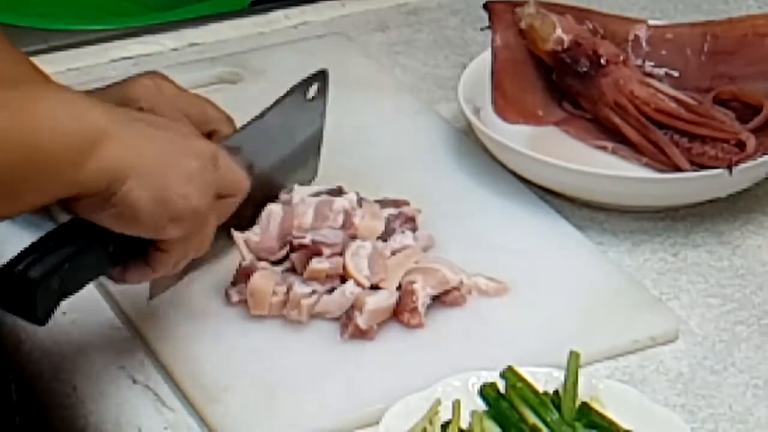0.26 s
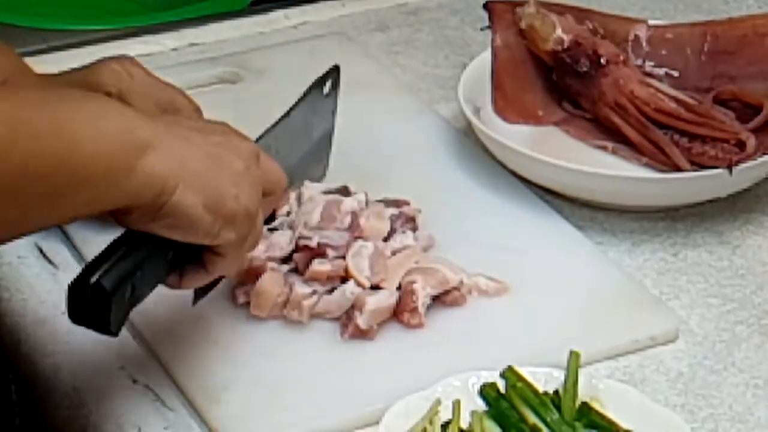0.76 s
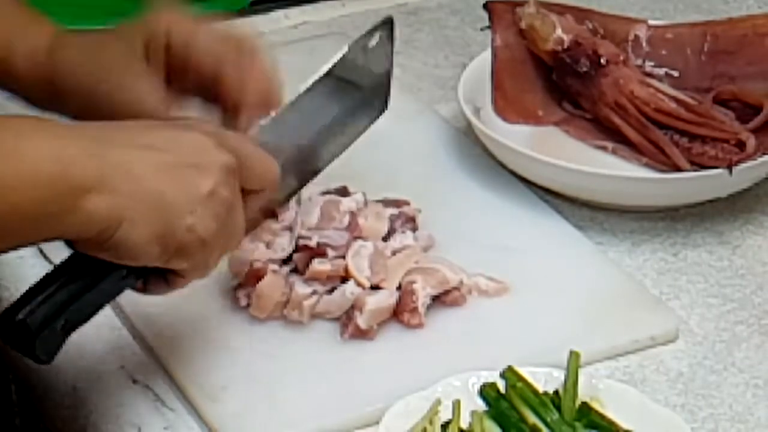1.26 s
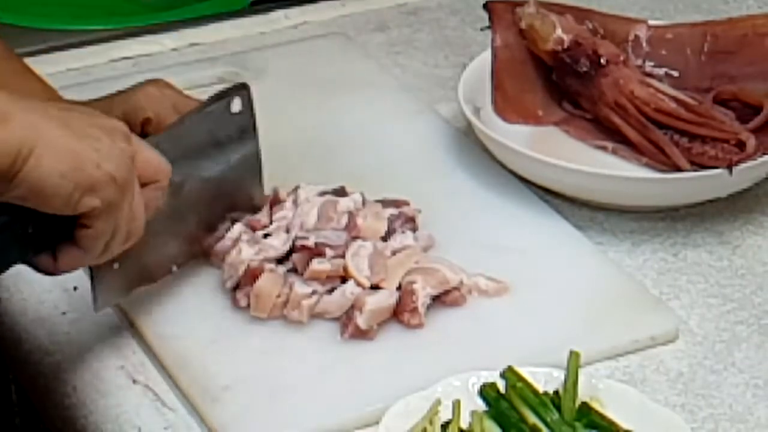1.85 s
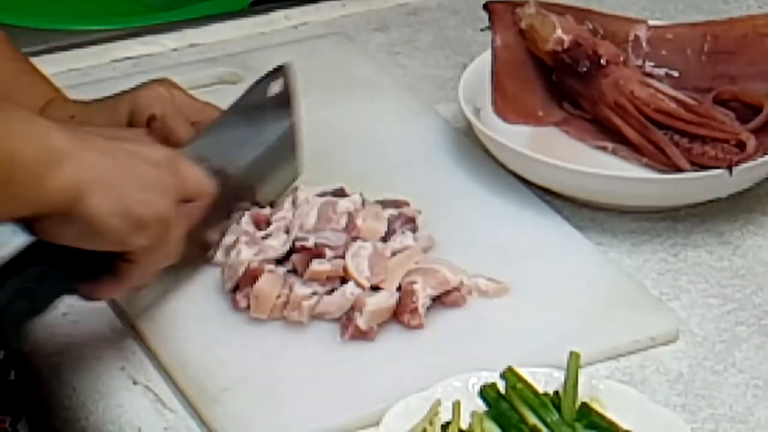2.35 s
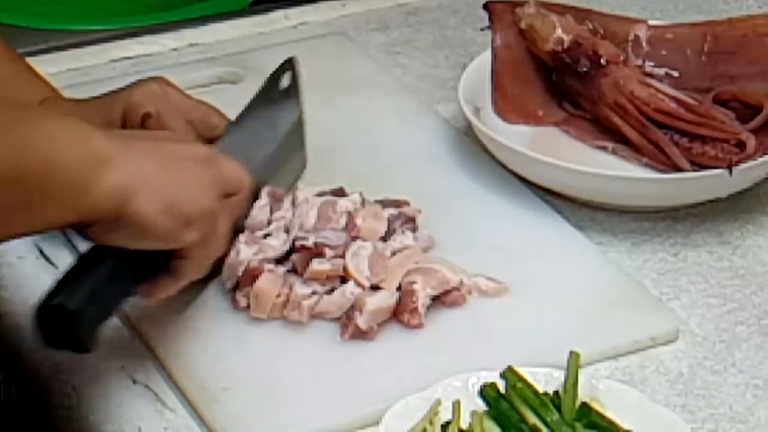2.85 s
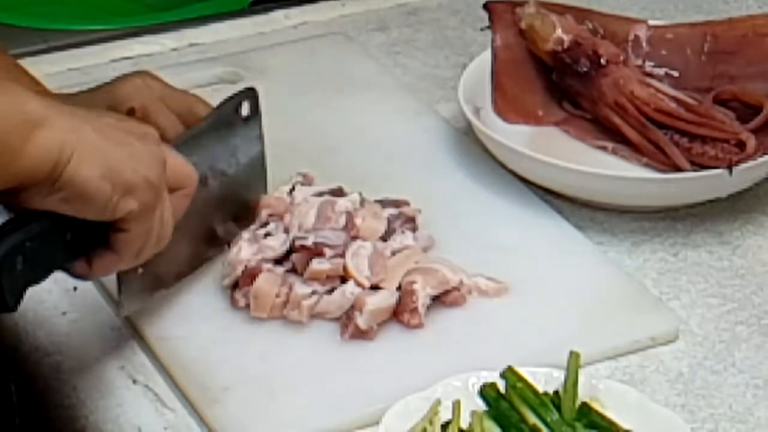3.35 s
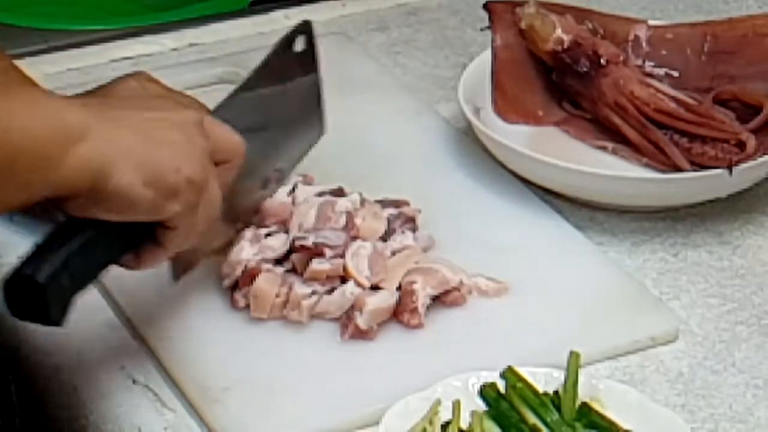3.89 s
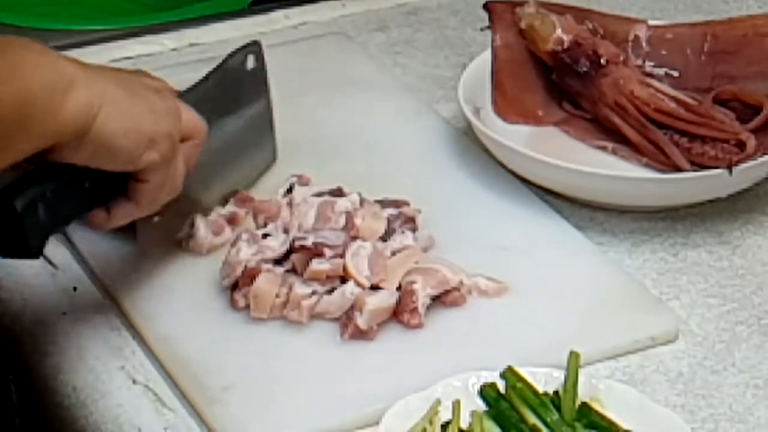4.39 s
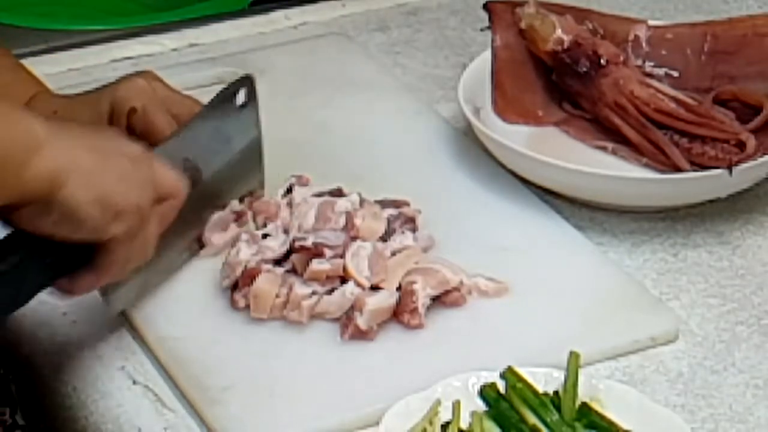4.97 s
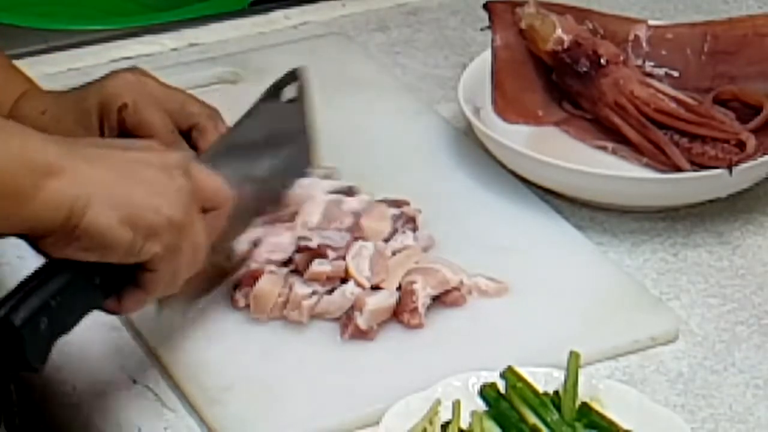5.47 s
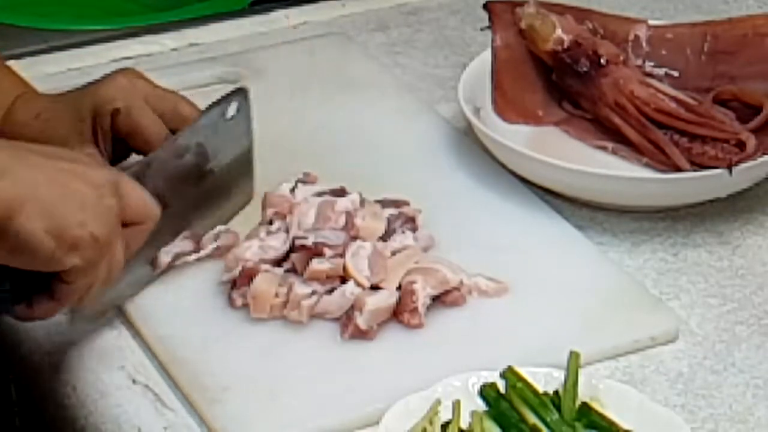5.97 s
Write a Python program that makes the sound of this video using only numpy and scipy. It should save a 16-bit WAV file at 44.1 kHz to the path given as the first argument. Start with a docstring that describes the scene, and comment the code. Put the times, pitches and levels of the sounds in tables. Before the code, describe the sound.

Close stereo pickup in a small, hard-walled kitchen. A low wavering appliance hum, room rumble and faint hiss run throughout. Wet meat ticks faintly, then a heavy cleaver slides and saws on a plastic board with dull, cushioned knocks at irregular intervals. Just past the middle one hard chop bangs loudly; softer sawing resumes, and a second sharp, hard chop lands near the end, followed by one last scrape.

```python
"""A heavy cleaver cuts pork on a plastic board in a small hard-walled kitchen.
From start to end an appliance hums (wavering lines) over room rumble and microphone hiss (shaped noise).
First the wet meat ticks (noise snaps with echoes); then the blade slides and saws (uneven, shaped noise).
From half a second on, the edge knocks through to the board (dying sines, echoes and a thud).
Two knocks are hard: one past the middle, and one near the end that a last slide follows."""
import sys
import numpy as np
from scipy import signal
from scipy.fft import rfft, irfft
from scipy.io import wavfile
from scipy.ndimage import uniform_filter1d

SR = 44100
rng = np.random.default_rng(int(sys.argv[2]) if len(sys.argv) > 2 else 0)


def inscribe(sig):
    """Save sig as 16-bit PCM at rate SR to the path in sys.argv[1].

    A 1-D sig is mono; a 2-D sig holds one channel per row.
    Samples are clipped to [-1, 1] before scaling.
    """
    pcm = np.round(np.clip(np.atleast_2d(sig).T, -1, 1) * 32767)
    wavfile.write(sys.argv[1], SR, pcm.astype(np.int16))


N = 274743  # length in samples

# Board and counter ringing together: f/Hz, level/dB (before chance), time to fall 60 dB/s (before the cap)
BOARD_MODES = [(55.3, -22, 1), (97, -22.5, 0.37), (121.3, -15, 0.65), (166, -4.5, 0.17),
               (210.6, -5.5, 0.17), (245.3, -5, 0.24), (280.2, -3, 0.24), (332, -6, 0.23),
               (357.3, -3, 0.19), (465.5, -4, 0.15), (545.3, -4, 0.45), (606, -11, .55), (625, -17, 0.25),
               (681, -9, 0.32), (765, -10, 0.54), (844, -16, 0.15), (857, -14, 0.84), (945, -27, 0.63),
               (1145, -9, 0.7), (1180, -14, 0.27), (1090, -4.5, 0.13), (1208, -0.5, 0.18),
               (1297, -5.5, 0.12), (1323, -6, 0.11), (1480, -7, 0.21), (1566, -7, 0.25)]
# The ringing steel blade: f/Hz, level/dB (before chance), time to fall 60 dB/s (before the cap)
BLADE_MODES = [(1877, -5, .16), (2094, -2, .17), (2380, -5, .14), (2680, 0, .19), (2950, -5, .14),
               (3560, -6, .15), (4400, -5, .16), (4750, -11, .12), (5360, -13, .12), (5900, -12, .13),
               (6869, -18, .11), (8500, -18, .1)]
# How alike left and right are: f/Hz, likeness (1 = the same)
LIKENESS = [(30, .995), (125, .96), (250, .96), (500, .65), (1000, .45), (2000, .45), (4000, .3),
            (12000, .15)]
# How fast the kitchen's echoes die: f/Hz, time to fall 60 dB/s
KITCHEN_DECAY = [(60, 0.67), (120, .7), (170, 0.4), (300, 0.32), (600, 0.39), (1000, 0.33), (2500, 0.21),
                 (5000, 0.19), (15000, 0.19)]


def knock(ring_db, soft_db, echo_db, rise_ms, thud_db):
    """A blunt blow rings the board's modes; a blow cushioned by meat leaves out the upper ones."""
    # A hard knock heard in the room: f/Hz, level/dB per Hz
    blow_colour = [(40, -31), (100, -23), (200, -6), (300, 1.5), (500, 3), (800, 4), (1500, -4.5),
                   (1800, -6.5), (2400, -9), (3300, -20.5), (5000, -27.5), (7000, -37), (9000, -39),
                   (12000, -45), (15800, -50)]

    def softened(hz):
        """Cushioning takes away treble: well above 450 Hz, soft_db for each octave."""
        return amp(-abs(soft_db) * 0.5 * np.log2(1 + (hz / 450) ** 2))

    t = np.arange(30000) / SR
    ring = rung(BOARD_MODES, softened, 0.91, rise_ms, size=len(t))
    walls = echo(lambda hz: amp(read(blow_colour, hz)) * softened(hz), rise_ms)
    # The thud goes straight to the microphones: about two cycles
    thud_envelope = t / 0.00068 * np.exp(1 - t / 0.00052)
    thud = np.sin(2 * np.pi * 750 * t) * thud_envelope
    return amp(ring_db) * (ring + amp(echo_db) * walls + amp(thud_db) * thud)


def slide(press_s, hold_s, change_db, *levels_db, size=22050):
    """The edge catches on the board's grain: uneven slips rustle, scrape, shake the board and ring the blade."""
    # Colour of the rustle: f/Hz, level/dB per Hz
    rustle_colour = [(2060, -31), (3500, -38), (4260, 1), (4860, -2), (5580, -4.5), (8840, -2.5),
                     (12800, -6), (15800, -12)]
    # Colour of the board's rumble: f/Hz, level/dB per Hz
    rumble_colour = [(24, -26), (40, -16), (104, 6), (207, -8.5), (238, -3), (334, -10.5), (428, -5),
                     (469, -11), (625, -15), (900, -10), (1170, -80), (1980, -120)]
    # Colour of the scrape: f/Hz, level/dB per Hz
    scrape_colour = [(350, -36), (600, -16), (879, -6), (1070, -1.5), (1250, 2), (1390, -7), (1800, -2),
                     (2040, -14.5), (2210, -6), (5000, -17.5), (6500, -26), (11000, -120)]
    # Fall after the edge lets go: one speed/dB per s each for rustle, rumble and scrape
    lift_db_per_s = [295, 158, 264]
    touch_db = -18  # a stroke starts this far under its full level

    t = np.arange(size) / SR
    lift_s = abs(press_s) + abs(hold_s)
    pressure_db = np.interp(t, [0, abs(press_s), lift_s], [touch_db, 0, change_db])
    lifted_s = np.maximum(t - lift_s, 0)
    # The slips vary the level slowly, by 2 dB rms
    slips = amp(2.0 * evened(uniform_filter1d(rng.standard_normal(size), 150)))

    def grain(colour):
        """Slipping noise with the given colour."""
        return evened(coloured(slips * pair(size), lambda hz: amp(read(colour, hz))))

    def shaken(sound, modes):
        """The sound keeps a set of modes ringing."""
        ring = rung(modes, np.ones_like, 0.76, 4.6, size=size)
        return evened(coloured(sound, lambda hz: rfft(ring)))

    rustle, rumble, scrape = grain(rustle_colour), grain(rumble_colour), grain(scrape_colour)
    rumble = evened(rumble + amp(-1) * shaken(rumble[0], BOARD_MODES))
    scrape = evened(scrape + amp(-9) * shaken(scrape[0], BLADE_MODES))
    stroke = 0
    for level_db, fall, sound in zip(levels_db, lift_db_per_s, (rustle, rumble, scrape)):
        stroke = stroke + amp(level_db - fall * lifted_s) * sound
    return amp(pressure_db) * stroke


def tick(level_db, centre_hz, width, broad_db, ring_db):
    """Wet meat and blade snap briefly with one bright band, heard mostly through its echoes."""
    # The broad part of a tick: f/Hz, level/dB per Hz
    smack_colour = [(88, -18), (150, -5), (315, 6.5), (447, -40), (786, -22), (1500, -4.5), (3810, -4),
                    (5740, -8), (15800, -14)]

    def band(hz):
        """A hump around the centre; width is a share of the centre frequency."""
        return np.exp(-0.5 * (np.log((hz + 1) / centre_hz) / abs(width)) ** 2)

    size = 12000
    bright = echo(band, 0.47, size=size)
    broad = echo(lambda hz: amp(read(smack_colour, hz)), 0.82, size=size)
    snap = bright + amp(broad_db) * broad
    # The blade is shaken for some ms
    chatter = rng.standard_normal((1, 900)) * np.exp(-np.arange(900) / 300)
    chatter = chatter / np.linalg.norm(chatter)
    ring = signal.fftconvolve(chatter, rung(BLADE_MODES, np.ones_like, 2.5, 2.7, size=size), axes=1)
    return amp(level_db) * (snap[:, :size] + amp(ring_db) * ring[:, :size])


def rung(modes, gain, spread_db, rise_ms, size):
    """Dying sines of a struck thing; each blow lands on another spot; the microphones differ in phase."""
    damping = 1.09  # meat and hand keep the ring within this many times the room's own decay
    t = np.arange(size) / SR
    hz, mode_db, t60 = np.transpose(modes)[:, :, None]
    t60 = np.minimum(t60, damping * read(KITCHEN_DECAY, hz))
    spot, shift = rng.standard_normal((2, len(modes), 1))
    start = 2 * np.pi * rng.random(hz.shape)
    apart = np.arccos(read(LIKENESS, hz)) * np.sign(shift)  # phase between left and right
    height = amp(mode_db + spread_db * spot) * gain(hz)
    # Each mode has close neighbours, so it beats
    beat_hz = (0.01 + 0.0179 * abs(shift)) * hz
    beat = 1 + 0.91 * np.sin(2 * np.pi * beat_hz * t + 3 * start)
    life = height * amp(-60 * t / t60) * swell(t, hz, rise_ms) * beat
    sides = [(life * np.sin(2 * np.pi * hz * t + start + side * apart)).sum(0) for side in (-0.5, 0.5)]
    return np.array(sides) / np.linalg.norm(height)


def echo(gain, rise_ms, size=30000):
    """Dense reflections of one short sound: each band builds, then dies at the kitchen's rate."""
    hz, t, bands = signal.stft(coloured(pair(size), gain), SR, nperseg=512, noverlap=448)
    # Rms of the noise before it builds and dies
    level = np.sqrt(np.mean(gain(np.linspace(0, SR / 2, size)) ** 2))
    decay = amp(-60 * t / read(KITCHEN_DECAY, hz)[:, None])
    shape = decay * swell(t + 0.0008, hz[:, None], rise_ms)
    tail = signal.istft(bands * shape, SR, nperseg=512, noverlap=448)[1][:, :size]
    onset = 1 - np.exp(-np.arange(size) / SR / 0.0002)
    return tail / level * onset


def swell(t, hz, rise_ms):
    """Reflections pile up: bass takes longer to build than treble; rise_ms is the time constant at 200 Hz."""
    rise_s = abs(rise_ms) / 1000 * 300 / (hz + 100)
    return 1 - np.exp(-t / rise_s)


def air():
    """Room rumble and microphone hiss as noise with soft patches, plus an appliance's wavering hum."""
    # Room and microphone: f/Hz, level/dB per Hz (only the colour counts; the loudness is set below)
    air_colour = [(22, -17.5), (42, -28), (62, -9), (85, -6.5), (123, -3), (160, -9.5), (276, -7),
                  (443, -14), (800, -18), (1650, -24), (3500, -32.5), (6500, -41.5), (10000, -44.5),
                  (13000, -41), (16000, -39.5)]
    # Wavering hum lines: f/Hz, level/dB, distance to half height on either side/Hz
    hum_lines = [(56.3, -63, 6.2), (114.2, -59.5, 4.7), (188.3, -68.5, 1.3)]
    air_db = -55
    hz, t, bands = signal.stft(pair(N), SR, nperseg=2048)
    patches = uniform_filter1d(rng.standard_normal(bands.shape[1:]), 20, 0)  # smooth over frequency
    patches = evened(uniform_filter1d(patches, 3, 1))  # smooth over time
    colour_db = read(air_colour, hz)[:, None] + 1.3 * patches
    noise = signal.istft(bands * amp(colour_db), SR, nperseg=2048)[1][:, :N]
    drive = rng.standard_normal(N)
    hum = 0
    for line_hz, line_db, width_hz in hum_lines:
        # Noise squeezed into a narrow line wavers in level
        line = coloured(drive, lambda f: 1 / (1 + ((f - line_hz) / width_hz) ** 2))
        hum = hum + amp(line_db) * evened(line)
    return amp(air_db) * evened(noise) + hum


def pair(size):
    """White noise for two microphones, alike in the bass, little related in the treble."""
    a, b = rng.standard_normal((2, size))

    def same(hz):
        return np.clip(read(LIKENESS, hz), 0, 1)

    shared = coloured(a, same)
    own = coloured(b, lambda hz: np.sqrt(1 - same(hz) ** 2))
    return np.array([a, shared + own])


def coloured(x, gain):
    """Multiplies the spectrum of x by gain(Hz)."""
    size = x.shape[-1]
    return irfft(rfft(x) * gain(np.fft.rfftfreq(size, 1 / SR)), size)


def read(points, hz):
    """Reads a table between its points, along a logarithmic frequency scale."""
    f, value = np.transpose(points)
    return np.interp(np.log(hz + 1), np.log(f + 1), value)


def amp(db):
    """Turns decibels into a factor."""
    return 10 ** (np.asarray(db) / 20)


def evened(x):
    """Scales x to an rms of 1."""
    return x / np.sqrt(np.mean(x ** 2) + 1e-20)


def add(mix, s, sound):
    """Adds a sound to the mix from second s on."""
    part = mix[:, round(s * SR):][:, :sound.shape[1]]
    part += sound[:, :part.shape[1]]


def scene():
    """Lays the knocks, slides and ticks over the background."""
    # Edge on board: t/s, ring level/dB, treble lost/dB per octave, echo share/dB, rise at 200 Hz/ms,
    # thud share/dB
    knock_list = [(.500, -32.5, 36, -8, 4.8, -28), (0.522, -40, 32, -8, 2.7, -22),
                  (.757, -31, 13.5, -14, 16, -28), (.79, -44.5, 21, -9, 5.9, -30),
                  (1.38, -44, 10, -7.5, 17, 1), (2.135, -39, 34, -28, 4.1, -20),
                  (2.443, -28, 20.5, -18, 31, -15), (2.502, -43, 11, -25, 2.9, -17),
                  (3.4127, -11.5, 6, -6, 20, -2), (3.825, -36.5, 9, -12, 21, -25),
                  (4.739, -37, 31, -13, 5, -12), (5.098, -32.5, 15, -13, 19, -24),
                  (5.9327, -14, 3.5, -5.5, 6.5, 5.5)]
    # Blade strokes: touch t/s, press/s, hold/s, change over the hold/dB, rustle level/dB,
    # board rumble level/dB, scrape level/dB
    slide_list = [(.44, 0.065, .03, -0.5, -72, -67, -63.5), (.645, 0.13, 0.047, -2.5, -73, -48.5, -57),
                  (2.01, .1, .06, -4.5, -70, -55, -61), (2.22, 0.082, 0.011, -3, -68, -68, -67),
                  (2.39, 0.07, 0.074, 2.5, -63, -43.5, -52.5), (2.575, 0.05, 0.12, 5.5, -65.5, -53, -58.5),
                  (2.81, 0.056, 0.17, -14.5, -64, -46.5, -56.5), (3.49, 0.044, 0.2, -2, -67, -47, -57.5),
                  (3.72, 0.059, 0.072, 6, -81, -53.5, -67), (4.29, 0.077, 0.016, -1, -70, -55, -62.5),
                  (4.47, 0.043, .06, 3.5, -78, -61.5, -72.5),
                  (4.645, 0.073, 0.051, -1.5, -63.5, -43.5, -55.5),
                  (4.855, 0.084, 0.049, -2, -71, -53.5, -64.5), (5.05, 0.038, 0.12, 0, -61, -48, -54),
                  (5.27, 0.037, .12, 2, -65, -53.5, -60.5), (5.44, 0.025, 0.089, 0, -73, -60, -69),
                  (5.52, .045, 0.044, 2, -74, -62, -65), (6.02, 0.059, .15, 2.5, -67, -49, -58)]
    # Wet meat and blade: t/s, bright band level/dB, centre f/Hz, width/share of the centre,
    # broad share/dB, blade ring share/dB
    tick_list = [(0.254, -75, 3500, .16, 13.5, -12), (.36, -71, 10600, .12, -11, -30),
                 (0.749, -53.5, 2340, .07, -4.5, -25), (0.767, -54.5, 2700, 0.06, 0.5, 5),
                 (0.9, -67, 13000, 0.23, -12, -30), (.938, -70, 8100, .21, -15, -30),
                 (1.028, -61, 11000, .24, -3, -32), (1.24, -74, 10500, .19, -1, -30),
                 (1.373, -56, 3900, 0.17, 8, -18), (1.378, -45.5, 3450, 0.23, 0, -25),
                 (1.48, -63, 3080, .32, -18, -16), (1.773, -67, 4570, 0.077, 11.5, -17),
                 (2.554, -59, 8500, 0.12, 2, -17), (2.851, -74, 4560, .2, 2, -2),
                 (3.04, -72, 11000, .19, -5, -30), (3.09, -70, 6700, 0.12, -15, -30),
                 (3.4136, -63.5, 9000, 0.076, 16, -23), (3.823, -68.5, 2770, .2, 10, 15.5),
                 (3.842, -54, 2010, .12, -2, 4.5), (4.108, -63.5, 2660, 0.13, 3.5, 5),
                 (4.898, -71.5, 4320, .18, 9.5, -5), (5.094, -68, 5320, .19, 14, -10),
                 (5.206, -49.5, 12500, .36, -3.5, -30), (5.571, -63, 3300, 0.17, 0, -6),
                 (5.9325, -65.5, 5840, .14, 8, -6)]
    mix = air()
    for events, source in ((knock_list, knock), (slide_list, slide), (tick_list, tick)):
        for s, *settings in events:
            add(mix, s, source(*settings))
    return mix


def record(dry):
    """The two microphones differ in colour and place; then the band limit takes off the top."""
    # Left minus right: f/Hz, level/dB
    tilt = [(30, -1.9), (125, -2.3), (500, -1.5), (1000, -1.9), (4000, -1.2), (8000, .9), (15000, .5)]
    lag_s = 6e-5  # the right microphone hears everything this much later
    edge_hz = 16000
    side = np.array([[0.5], [-0.5]])
    heard = coloured(dry, lambda hz: amp(side * read(tilt, hz)) * np.exp(2j * np.pi * hz * side * lag_s))
    band_limit = signal.firwin(511, edge_hz, window=("kaiser", 9), fs=SR)
    return signal.oaconvolve(heard, band_limit[None], "same")


dry = scene()
out = record(dry)
inscribe(out)
```